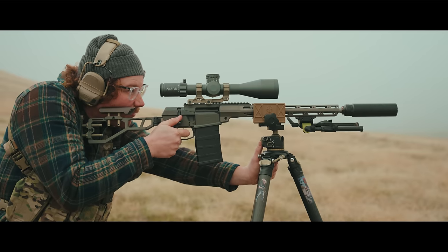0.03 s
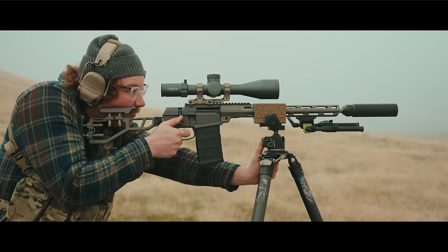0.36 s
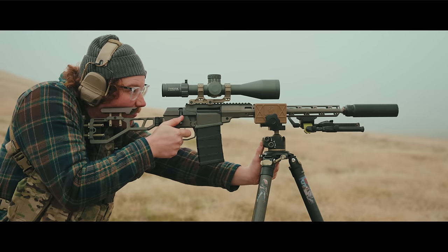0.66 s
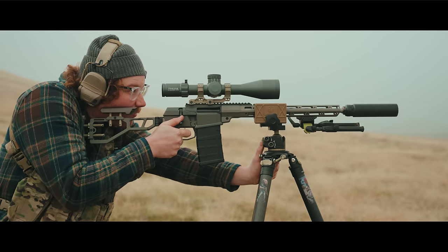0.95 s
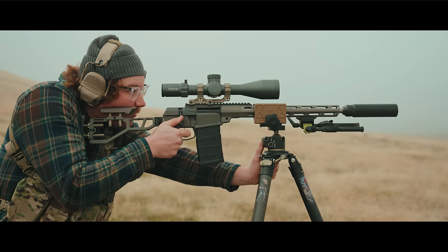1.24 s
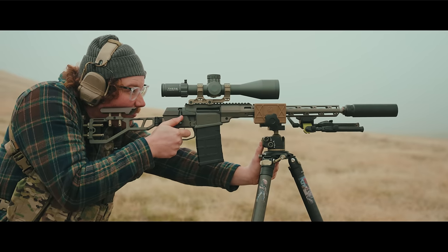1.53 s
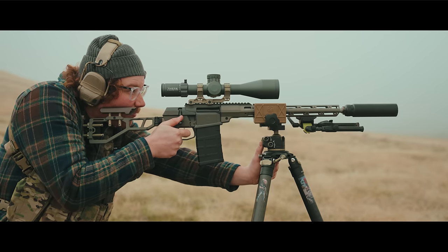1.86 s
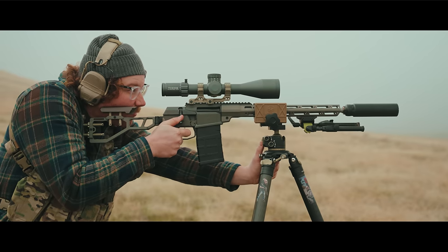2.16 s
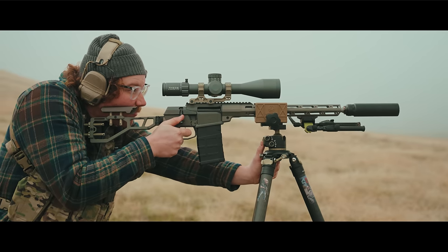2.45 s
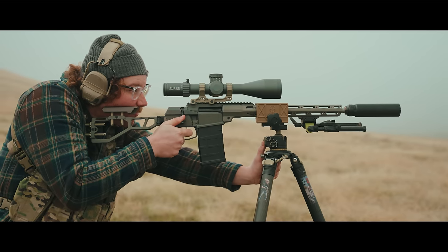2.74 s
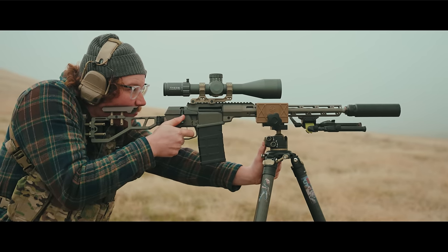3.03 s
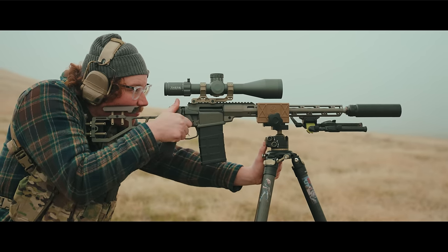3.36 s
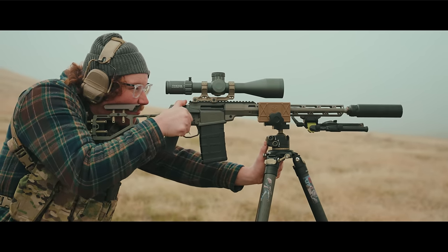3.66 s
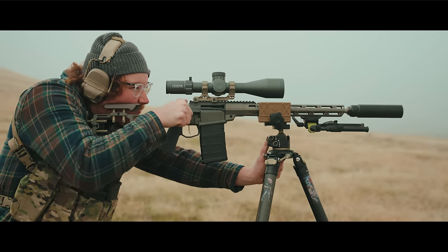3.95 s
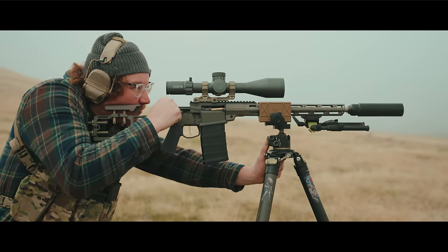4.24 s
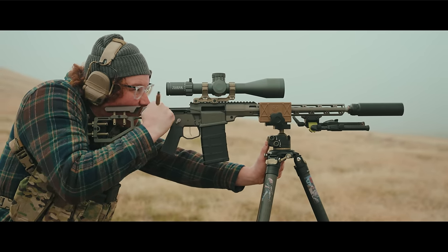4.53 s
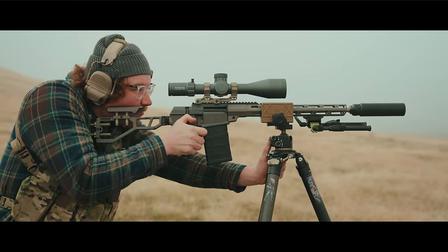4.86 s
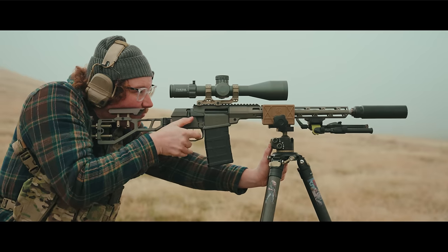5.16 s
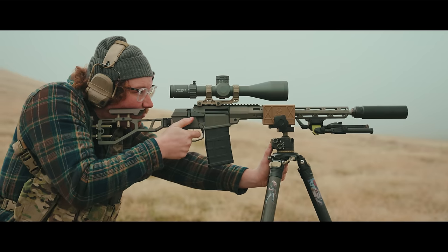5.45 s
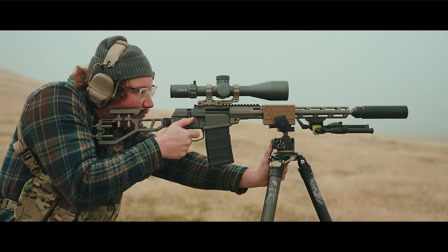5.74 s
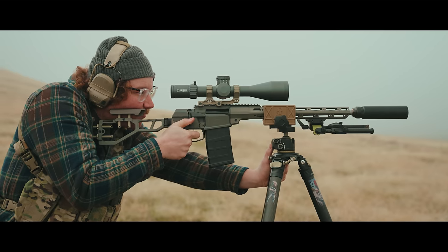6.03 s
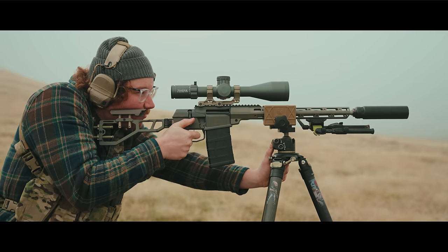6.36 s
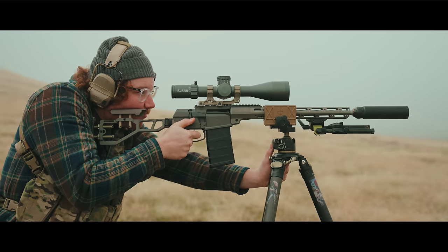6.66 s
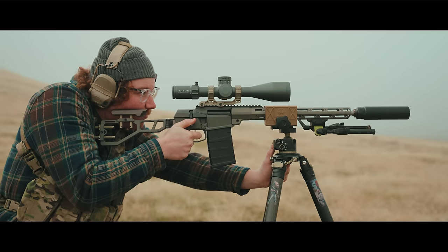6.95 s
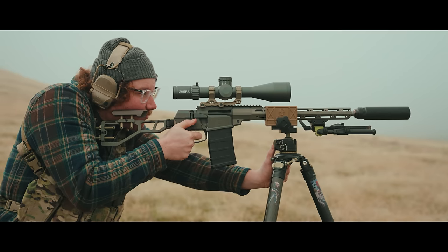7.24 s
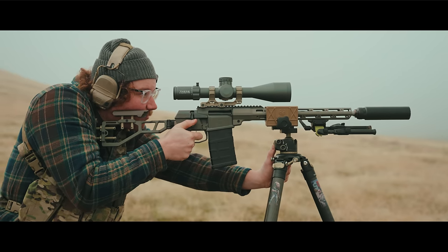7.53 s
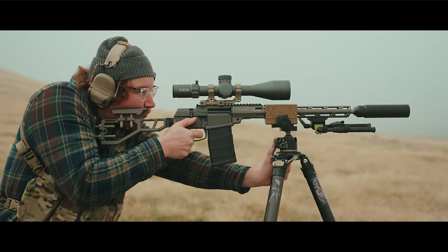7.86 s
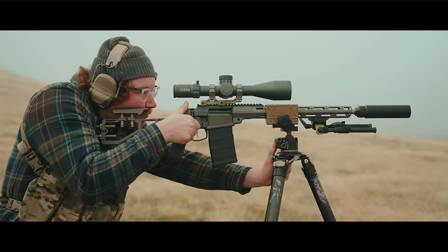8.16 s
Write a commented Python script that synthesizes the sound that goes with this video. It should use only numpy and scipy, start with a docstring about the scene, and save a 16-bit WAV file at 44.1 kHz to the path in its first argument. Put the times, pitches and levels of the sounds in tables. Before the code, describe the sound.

Wind rushes softly over dry grass on an open hillside, with a low rumble and a steady hiss. It is strongest at the start, whistles briefly at about 0.8 and 2.4 seconds and faintly near 5.9, and slowly drops. At 2.9 seconds a suppressed rifle fires, close and centred: a sharp crack, muffled blast and thump of gas that overload the microphone. The hillside scatters the shot, and far slopes answer faintly about half a second and one second later. At 4.1 seconds the steel bolt lifts with a click. It clacks back at 4.4, and the spent brass case flies out with a light ping and hollow ring. Around 4.8 the bolt scrapes forward and locks with a quick cluster of hard clicks. Only faint wind remains until the second shot at 7.7 seconds, just as sharp and with a heavier thump.

```python
"""Wind rushes over dry grass on an open hillside, whistles briefly a few times and slowly drops.
A suppressed bolt-action rifle fires twice, so close that the microphone overloads on each blast.
Each shot is a bullet's crack, a muffled blast and a thump of gas; the hillside scatters it back
and far slopes answer faintly. Between the shots the steel bolt is lifted, pulled back
(the spent brass case flies out ringing), pushed home and locked."""
import sys
import numpy as np
from scipy import signal
from scipy.fft import rfft, irfft, next_fast_len
from scipy.io import wavfile
from scipy.ndimage import uniform_filter1d, map_coordinates

SR = 44100
rng = np.random.default_rng(int(sys.argv[2]) if len(sys.argv) > 2 else 0)


def put_to_file(sound):
    """Save the sound as 16-bit audio at rate SR, in the file named by the first command-line argument."""
    columns = np.atleast_2d(sound).T  # one column per channel
    safe = np.clip(columns, -1, 1)
    whole_steps = np.round(safe * 32767)
    wavfile.write(sys.argv[1], SR, whole_steps.astype(np.int16))


N = 361619


def amp(db):
    """Turn decibels into a gain."""
    return 10 ** (np.asarray(db) / 20)


def unit(x):
    """Scale a signal to an average (rms) level of 1."""
    return x / np.sqrt(np.mean(x ** 2) + 1e-20)


def along(points, hz):
    """Read between (pitch_hz, value) points on a log pitch scale."""
    pitches, values = np.transpose(points)
    return np.interp(np.log(hz + 1), np.log(pitches + 1), values)


def filtered(x, response):
    """Give each frequency in x the gain response(hz)."""
    n = x.shape[-1]
    padded = next_fast_len(n + 8192)
    return irfft(rfft(x, padded) * response(np.fft.rfftfreq(padded, 1 / SR)), padded)[..., :n]


def noise(colour, size):
    """Noise of level 1, shaped by a colour: a list of (pitch_hz, level_db)."""
    return unit(filtered(rng.standard_normal(size), lambda hz: amp(along(colour, hz))))


def fade(t, fade_s):
    """Start at t = 0 and die away by 60 dB every fade_s."""
    return (t >= 0) * np.exp(-np.log(1000) * np.maximum(t, 0) / fade_s)


def rise(t, attack_s):
    """A soft start at t = 0."""
    return 1 - np.exp(-np.maximum(t, 0) / attack_s)


def wobble(rate_hz):
    """A smooth curve through rate_hz random values a second."""
    values = rng.standard_normal(int(N * rate_hz / SR) + 4)
    return map_coordinates(values, [np.arange(N) * rate_hz / SR])


def add(track, start_s, sound):
    """Mix a sound into the track at start_s."""
    part = track[round(start_s * SR):][:len(sound)]
    part += sound[:len(part)]


# How alike the wind is in both ears (1 = the same): pitch_hz, likeness
EAR_LIKENESS = [(60, 0.75), (150, 0.83), (380, 0.59), (950, 0.38), (2380, 0.19), (5980, 0.13),
                (15000, 0.51)]

def airflow(colour, patchy_db):
    """Moving air: stereo noise in which patches of pitch swell and sink."""
    spectrum = signal.stft(rng.standard_normal((2, N)), nperseg=1024)[2]
    patches = uniform_filter1d(rng.standard_normal(spectrum.shape[1:]), size=6, axis=0)
    patches = uniform_filter1d(patches, size=12, axis=1)
    pair = signal.istft(spectrum * amp(patchy_db * unit(patches)), nperseg=1024)[1][:, :N]

    def colour_and_width(hz):
        angle = np.arccos(np.clip(along(EAR_LIKENESS, hz), -1, 1)) / 2
        return amp(along(colour, hz)) * [np.cos(angle), np.sin(angle)]

    mid, side = filtered(pair, colour_and_width)
    return np.array([mid + side, mid - side]) / np.std(mid)


# How hard the wind blows: time_s, strength_db
WIND_STRENGTH = [(0.0, -38.5), (0.43, -42.5), (1.03, -41.5), (1.44, -44), (1.6, -47.5), (2.26, -45),
                 (2.65, -46.5), (3.01, -45), (3.93, -48), (4.73, -49.5), (5.0, -54.5), (5.6, -56),
                 (6.32, -56), (6.58, -57.5), (7.06, -58.5), (7.79, -58), (8.2, -59)]
# The wind's four layers, from low to high: pitch_hz, level_db
RUMBLE_COLOUR = [(20, -9.5), (35, -11.5), (50, -10), (80, -3.5), (120, -1.5), (200, -6), (350, -19.5),
                 (700, -43)]
RUSH_COLOUR = [(80, -14.5), (180, -3), (280, -1.5), (500, 0), (700, -4.5), (950, -18.5), (1400, -41),
               (3000, -60)]
EDGE_COLOUR = [(400, -20.5), (750, 1.5), (1000, 0.5), (1250, -6), (1600, -14), (2300, -23.5), (4000, -48),
               (8000, -55)]
GRASS_COLOUR = [(500, 7), (1500, 6.5), (2500, 3), (4000, 0.5), (7000, -0.5), (11000, -0.5), (14000, -3.5),
                (16000, -7.5)]

def wind():
    """One wind strength drives a rumble, a rush, a whistling edge and the grass, over a steady hiss."""
    breeze_db, hiss_db = -46.5, -58.5
    edge_limit_db = 6.5  # this far above a middling breeze, the edge stops growing
    time_s, strength_db = np.transpose(WIND_STRENGTH)
    gust_db = np.interp(np.arange(N) / SR, time_s, strength_db) - breeze_db + 0.65 * wobble(5.02)
    # each layer has its level in that breeze, plus its own share of the gust
    rumble = amp(-43 + 0.4 * gust_db + 0.8 * wobble(4)) * airflow(RUMBLE_COLOUR, patchy_db=0.5)
    rush = amp(-42.5 + 0.48 * gust_db) * airflow(RUSH_COLOUR, patchy_db=0.77)
    edge = amp(-46 + 1.22 * np.minimum(gust_db, edge_limit_db)) * airflow(EDGE_COLOUR, patchy_db=2)
    grass = np.hypot(amp(-58 + gust_db), amp(hiss_db)) * airflow(GRASS_COLOUR, patchy_db=1.5)
    return rumble + rush + edge + grass


# Gusts that whistle: peak_s, pitch_hz, level_db, half_length_s
WHISTLING_GUSTS = [(0.794, 1127, -40, 0.067), (2.35, 1090, -44, 0.032), (5.937, 784, -49.5, 0.03)]

def whistles():
    """A fast gust sheds little swirls of air that sound in a narrow band of pitches."""
    out, t = np.zeros(N), np.arange(N) / SR
    for peak_s, pitch_hz, level_db, half_length_s in WHISTLING_GUSTS:
        swirls = unit(filtered(rng.standard_normal(N), lambda hz: 1 / (1 + ((hz - pitch_hz) / 45) ** 2)))
        out += amp(level_db) * swirls * np.exp(-((t - peak_s) / half_length_s) ** 2)
    return out


# Far slopes that return each shot: delay_s, level_db, swell_s, fade_s
ECHO_SLOPES = [(.44, -49.5, 0.074, 1.6), (1.08, -45, 0.12, 3.6)]
# Their echo before the air dulls it: pitch_hz, level_db
ECHO_COLOUR = [(600, -22), (1500, -3.5), (2800, -1.5), (4000, -5), (8000, -5), (16000, -20)]

def far_echoes():
    """Far slopes return each crack as a soft wash; the longer the way, the duller it comes back."""
    out, t = np.zeros(N), np.arange(3 * SR) / SR
    air_loss_db_per_s = 10.5  # at 4000 Hz; higher pitches lose more
    for start_s, *_ in RIFLE_SHOTS:
        for delay_s, level_db, swell_s, fade_s in ECHO_SLOPES:
            wash = noise(ECHO_COLOUR, len(t))
            dulled = filtered(wash, lambda hz: amp(-air_loss_db_per_s * delay_s * (hz / 4000) ** 2))
            swell = np.exp(-((t - delay_s) / swell_s) ** 2 / 2)
            shape = np.where(t < delay_s, swell, fade(t - delay_s, fade_s))
            add(out, start_s, amp(level_db) * dulled * shape)
    return out


# What the nearby ground throws back: pitch_hz, level_db
HILLSIDE_COLOUR = [(40, -12), (150, -5), (400, -2), (900, 1.5), (1600, 0.5), (3000, 2), (6000, 1.5),
                   (10000, 1), (16000, -10)]
# How long the hillside rings: pitch_hz, fade_s
HILLSIDE_FADE = [(100, 0.93), (1000, 0.49), (3000, 0.41), (8000, 0.33), (16000, 0.28)]

def hillside(t):
    """Rough ground scatters a shot: the treble dies first, and a nearby bank returns a stronger swell."""
    hz, frame_s, spectrum = signal.stft(noise(HILLSIDE_COLOUR, len(t)), SR, nperseg=256)
    fading = spectrum * fade(frame_s, along(HILLSIDE_FADE, hz)[:, None])
    tail = signal.istft(fading, SR, nperseg=256)[1][:len(t)]
    bank = 0.97 * np.exp(-((t - 0.057) / 0.011) ** 2)
    grain = amp(1.2 * wobble(250)[:len(t)])
    return amp(5) * tail * grain * rise(t, 0.0091) * (1 + bank)


def ring(tones, t):
    """A struck object rings with pure tones, each dying away at its own speed."""
    return sum(amp(level_db) * fade(t, fade_s) * np.sin(2 * np.pi * (pitch_hz * t + rng.random()))
               for pitch_hz, level_db, fade_s in tones)


# Tones of the case's brass wall and of the air inside it: pitch_hz, level_db, fade_s
BRASS_TONES = [(10480, -8.5, 0.059), (11100, 1.5, 0.098), (11100, -1, 0.047)]
HOLLOW_TONES = [(1001, -3, 0.9), (1015, -7, 0.27), (1710, 2, 0.24), (1710, -15, 1.8), (1766, -7, 0.36),
                (1980, -11, 0.38)]
# Pings of the case, cut short by the chamber around it: start_s, level_db, attack_s, fade_s
CHAMBER_PINGS = [(4.346, -22.5, .0005, .022), (4.355, -21, .004, 0.098)]

def spent_case():
    """The brass wall pings as it is drawn from the chamber; once thrown out, the hollow case hums."""
    out, t = np.zeros(N), np.arange(SR) / SR
    for start_s, level_db, attack_s, fade_s in CHAMBER_PINGS:
        add(out, start_s, amp(level_db) * ring(BRASS_TONES, t) * rise(t, attack_s) * fade(t, fade_s))
    eject_s, hum_db = 4.413, -36
    add(out, eject_s, amp(hum_db) * ring(HOLLOW_TONES, t) * rise(t, 0.0035))
    return out


# Where the rifle's working parts ring: pitch_hz, width_hz, level_db
STEEL_TONES = [(980, 89, 3.5), (1216, 170, 3.5), (1820, 110, -7), (2320, 220, -5), (2960, 330, -1),
               (3600, 180, -11.5), (4340, 190, 1.5), (4800, 280, -2.5), (5300, 210, 2), (6430, 170, -5),
               (8460, 520, -3.5), (9100, 230, 0.5), (11000, 270, -10), (12400, 490, -14)]

def steel_response(hz):
    """How the rifle's steel answers a touch: ringing tones over a broad click, with little bass."""
    ringing = sum(amp(level_db) * 1j * hz * width_hz / (pitch_hz ** 2 - hz ** 2 + 1j * hz * width_hz)
                  for pitch_hz, width_hz, level_db in STEEL_TONES)
    bass_cut = (1j * hz / (420 + 1j * hz)) ** 2
    return (ringing + 0.68) * bass_cut


# Steel rubbing on steel: pitch_hz, level_db
SCRAPE_COLOUR = [(300, -1), (1000, 12.5), (2500, 5), (6000, -7), (10000, -6), (16000, -13)]
# The bolt slides back, then forward: peak_s, level_db, rise_db_per_s, hold_s, tilt_db_per_octave
BOLT_SLIDES = [(4.333, -51, 130, 0.046, 5.5), (4.767, -31, 750, .042, 0)]

def bolt_scrapes():
    """The bolt scrapes along its track, lightly back and hard forward."""
    out, t = np.zeros(N), np.arange(N) / SR
    fall_db_per_s = 480
    # sliding steel catches and slips a few hundred times a second
    friction = rng.standard_normal(N) * amp(2.8 * wobble(350))
    for peak_s, level_db, rise_db_per_s, hold_s, tilt_db_per_octave in BOLT_SLIDES:
        colour = lambda hz: amp(along(SCRAPE_COLOUR, hz) + tilt_db_per_octave * np.log2(hz + 1))
        scrape = unit(filtered(friction, lambda hz: steel_response(hz) * colour(hz)))
        rise_db = rise_db_per_s * np.minimum(t - peak_s, 0)
        fall_db = fall_db_per_s * np.maximum(t - peak_s - hold_s, 0)
        out += scrape * amp(level_db + rise_db - fall_db)
    return out


def steel_click(peak_db, knock_db, bright_db, lead_s):
    """Loose parts touch lightly; lead_s later steel hits steel and the whole rifle rattles faintly."""
    t = np.arange(SR // 5) / SR
    contact_fade_s, since_hit = 0.014, t - lead_s
    touch = amp(-21.5) * fade(t, contact_fade_s)
    rattle = amp(-23) * fade(since_hit, 0.097)
    hit = rise(since_hit, 0.00055) * (fade(since_hit, contact_fade_s) + rattle)
    force = rng.standard_normal(len(t)) * (touch + hit)
    colour = [(400, knock_db + 14), (1000, knock_db + 8), (1900, knock_db / 2 + 6),
              (3500, -6), (10000, bright_db + 6), (16000, bright_db)]
    click = filtered(force, lambda hz: steel_response(hz) * amp(along(colour, hz)))
    loudest = np.sqrt(np.abs(uniform_filter1d(click ** 2, size=88)).max())
    return amp(peak_db - 6) * click / loudest  # the loudest 2 ms average 6 dB below peak_db


# The bolt is lifted (1 hit), pulled back (5), pushed home (4) and locked (3):
# hit_s, peak_db, knock_db, bright_db
BOLT_HITS = [(4.079, -8.5, -12.5, -21), (4.336, -28.5, -7, -20), (4.3452, -19, -18, -23),
             (4.3832, -4.5, -18, -19.5), (4.394, -20.5, -6, -16), (4.412, -20, 13, -43),
             (4.702, -32.5, -23, -17), (4.771, -13.5, -6, -24), (4.787, -13, -11, -14),
             (4.795, -13.5, -13, -8), (4.8184, -2, -18.5, -14.5), (4.8526, -18.5, -10.5, -12),
             (4.9288, -27, -4, -17)]

def bolt_knocks():
    """The steel bolt knocks against its stops."""
    out, lead_s = np.zeros(N), 0.004
    for hit_s, peak_db, knock_db, bright_db in BOLT_HITS:
        add(out, hit_s - lead_s, steel_click(peak_db, knock_db, bright_db, lead_s))
    return out


# The bullet's crack and the thump of escaping gas: pitch_hz, level_db
CRACK_COLOUR = [(60, -34), (160, 2), (290, 13), (700, -1), (1500, 3), (2300, 4), (3000, 7), (5500, 4.5),
                (8500, 6), (12000, 4), (16000, 1)]
THUMP_COLOUR = [(30, -5), (90, 9), (140, 8.5), (210, -4), (330, -2), (450, -17), (900, -48), (2000, -70)]
# The two shots: start_s, crack_db, blast_db, thump_db, echo_db
RIFLE_SHOTS = [(2.8719, -6, 6, -18, -24.5), (7.7474, -6, 6.5, -10.5, -25)]

def shots():
    """The bullet's crack, the muffled muzzle blast just after it, a thump of gas and the hill's answer."""
    out, t = np.zeros(N), np.arange(SR) / SR
    blast_hz, blast_delay_s = 840, 0.0016
    since_blast = np.maximum(t - blast_delay_s, 0)
    blast = np.sin(2 * np.pi * blast_hz * since_blast) * fade(since_blast, 0.0041)
    # the crack keeps arriving from the ground along the bullet's path
    ground = 0.23 * np.exp(-((t - 0.015) / 0.01) ** 2)
    for start_s, crack_db, blast_db, thump_db, echo_db in RIFLE_SHOTS:
        crack = noise(CRACK_COLOUR, len(t)) * rise(t, 0.0004) * (fade(t, 0.05) + ground)
        thump = noise(THUMP_COLOUR, len(t)) * rise(since_blast, 0.00052) * fade(since_blast, 0.028)
        shot = amp(crack_db) * crack + amp(blast_db) * blast + amp(thump_db) * thump
        add(out, start_s, shot + amp(echo_db) * hillside(t))
    return out


def scene():
    """The rifle sits in the centre; the wind is all around, a little stronger on the right."""
    centre = shots() + far_echoes() + bolt_knocks() + bolt_scrapes() + spent_case() + whistles()
    return centre + wind() * amp([[-0.18], [0.18]])


def record(dry):
    """The microphone overloads, squashing the loudest peaks, and the very highest treble is cut."""
    ceiling, hardness, top_hz = 0.58, 4, 15900
    squashed = dry / (1 + np.abs(dry / ceiling) ** hardness) ** (1 / hardness)
    return filtered(squashed, lambda hz: 1 / (1 + (hz / top_hz) ** 160))


dry = scene()
out = record(dry)
put_to_file(out)
```